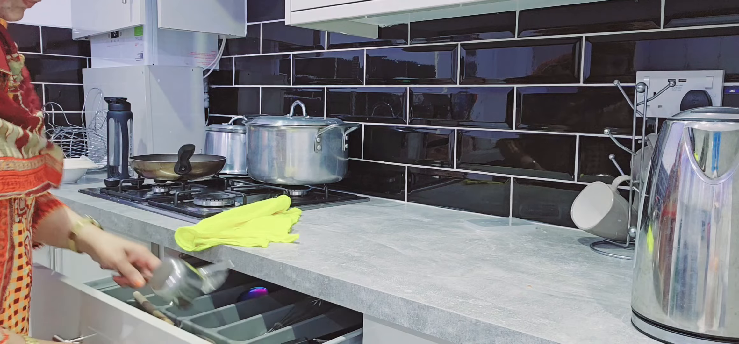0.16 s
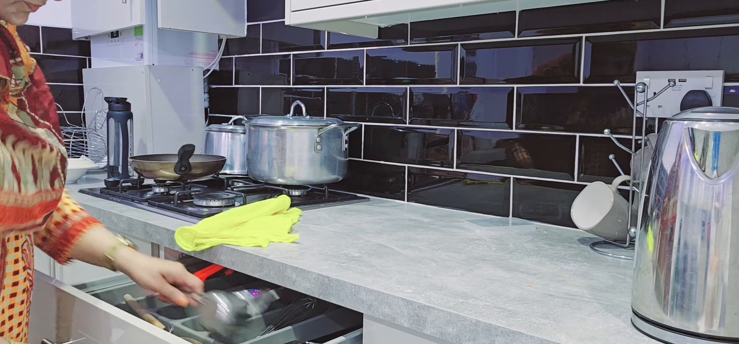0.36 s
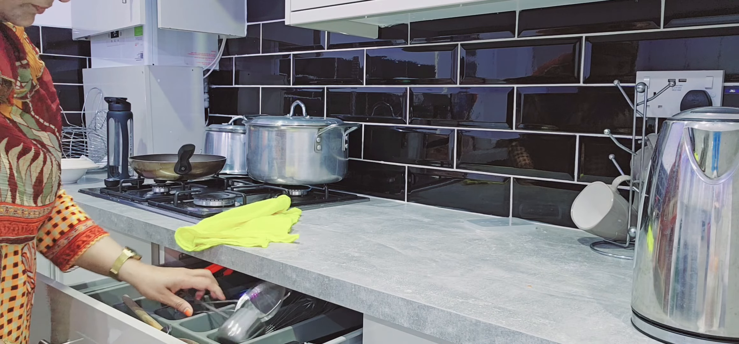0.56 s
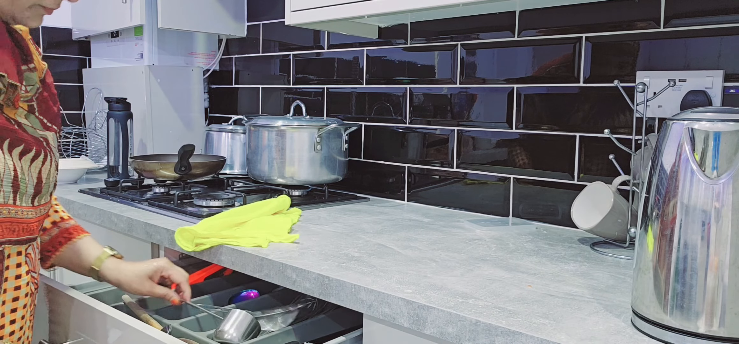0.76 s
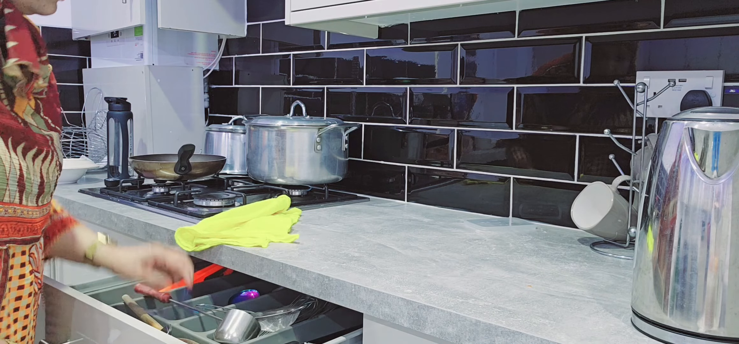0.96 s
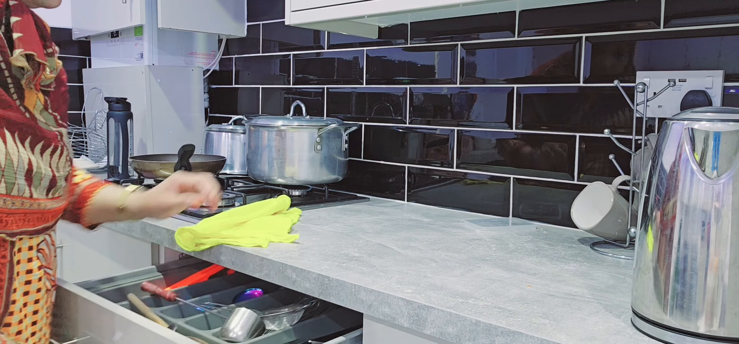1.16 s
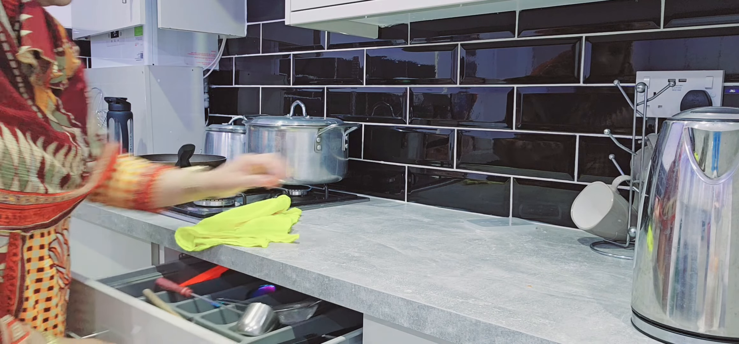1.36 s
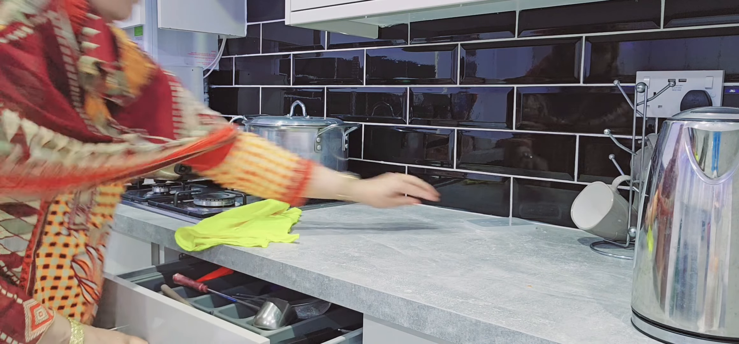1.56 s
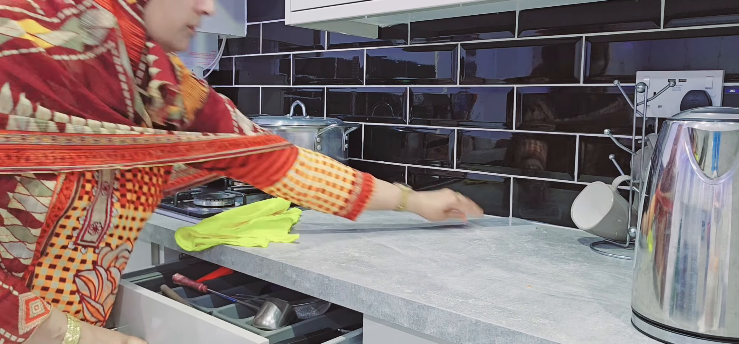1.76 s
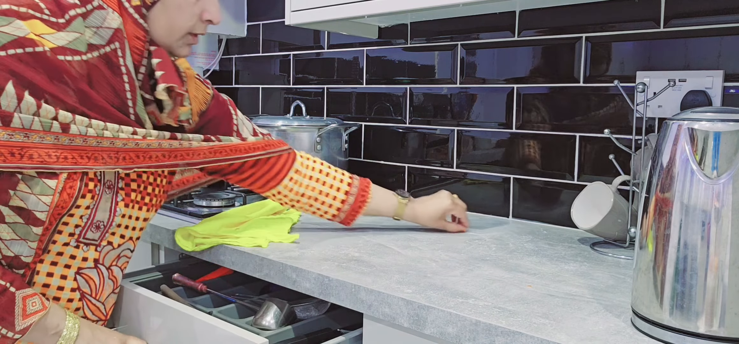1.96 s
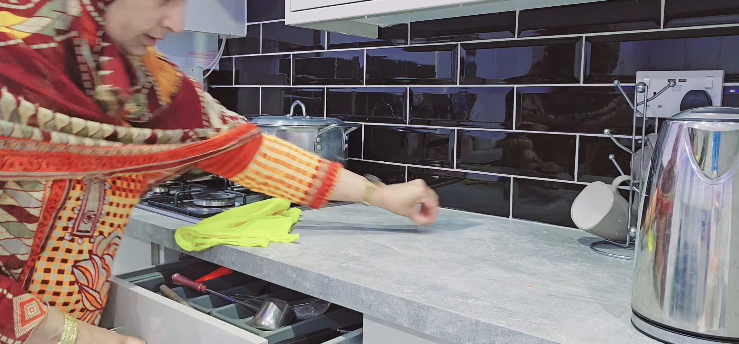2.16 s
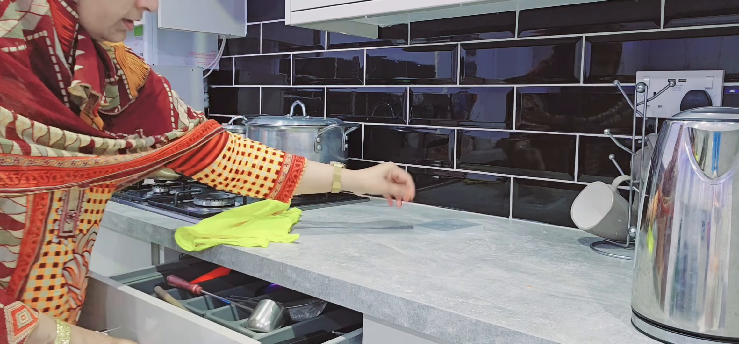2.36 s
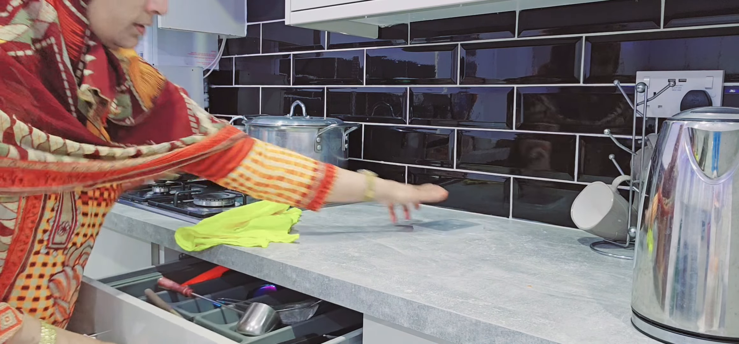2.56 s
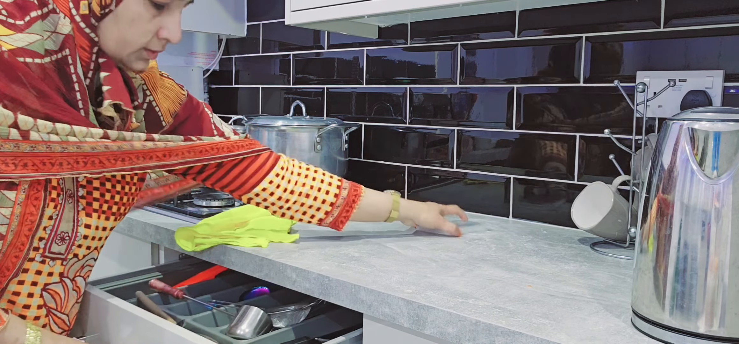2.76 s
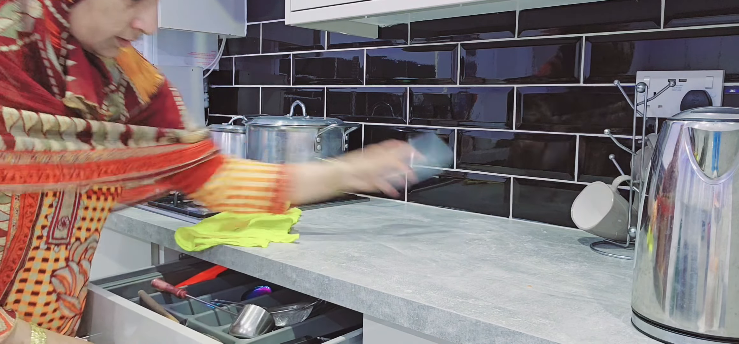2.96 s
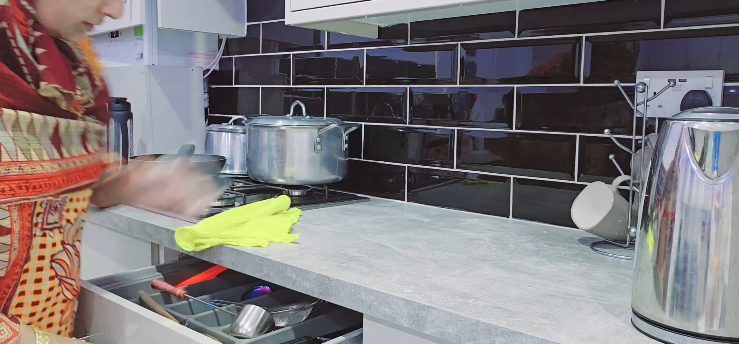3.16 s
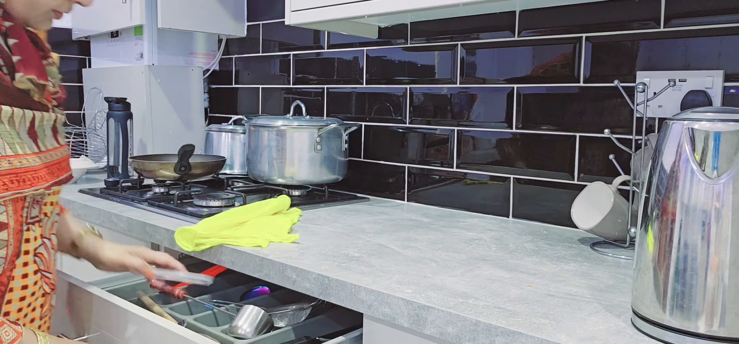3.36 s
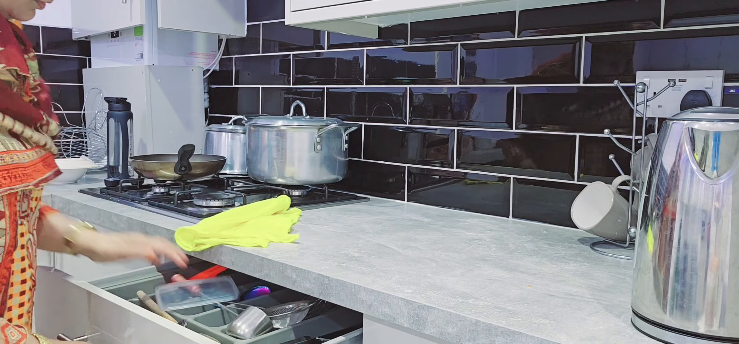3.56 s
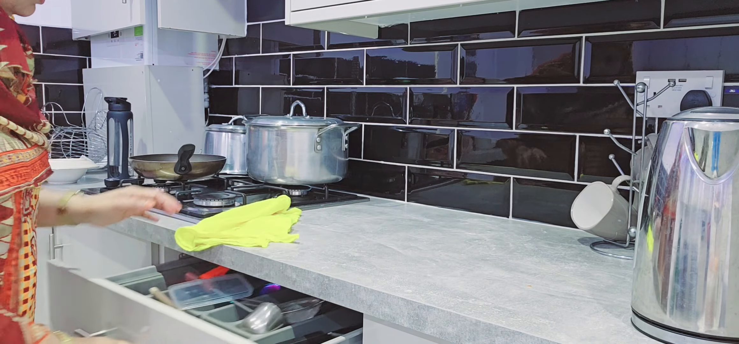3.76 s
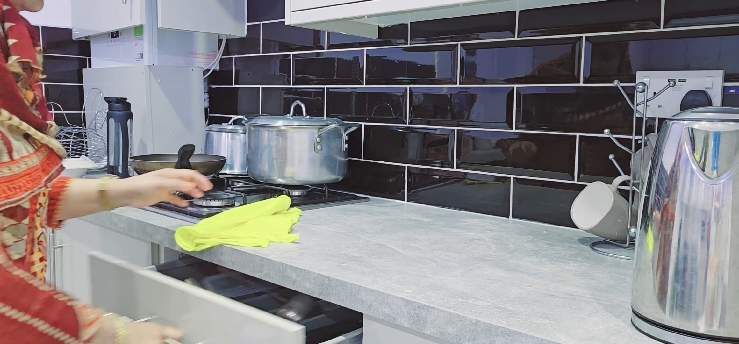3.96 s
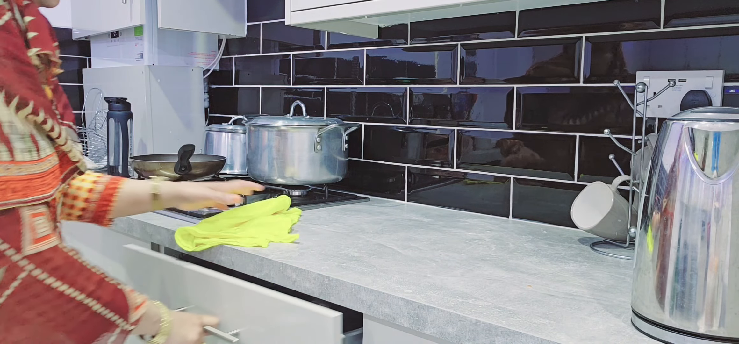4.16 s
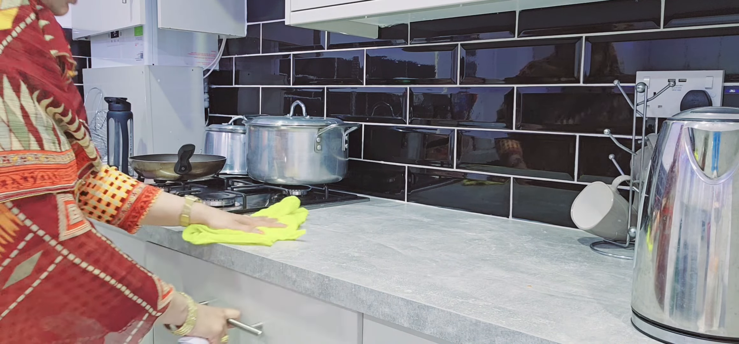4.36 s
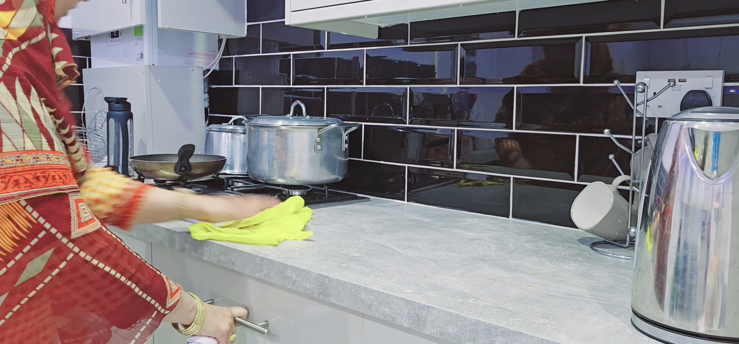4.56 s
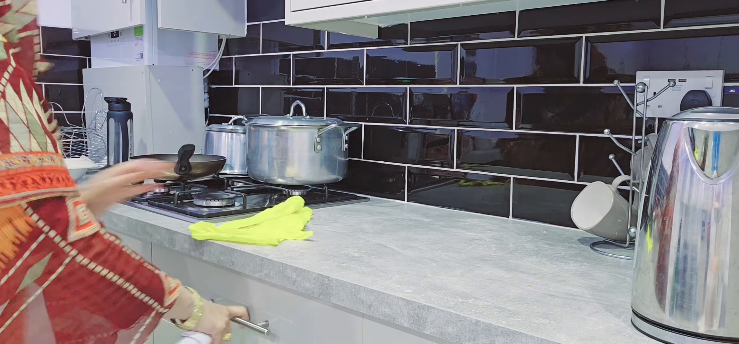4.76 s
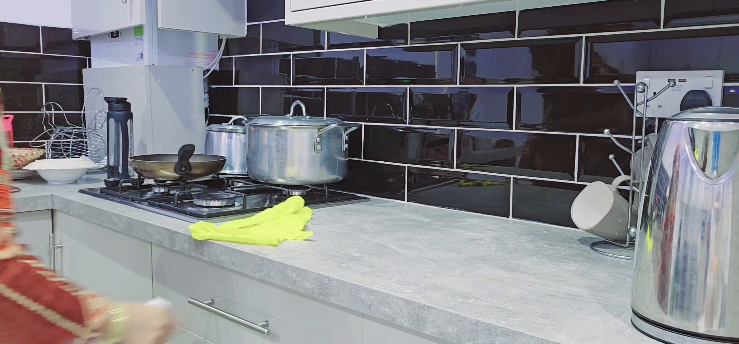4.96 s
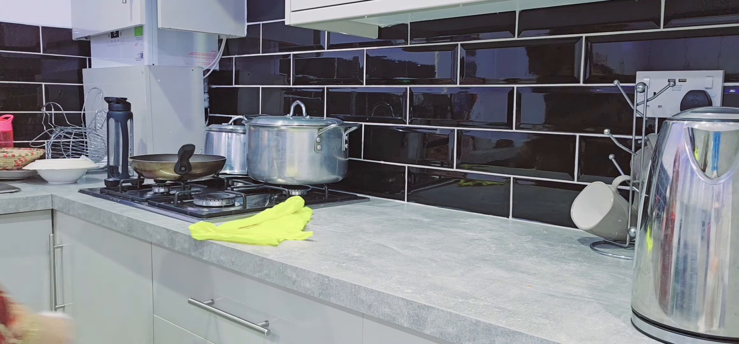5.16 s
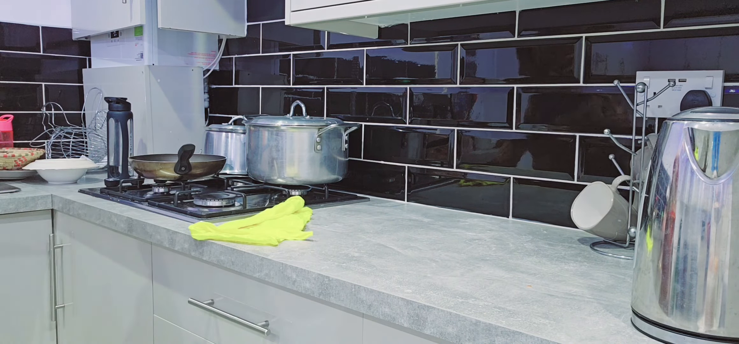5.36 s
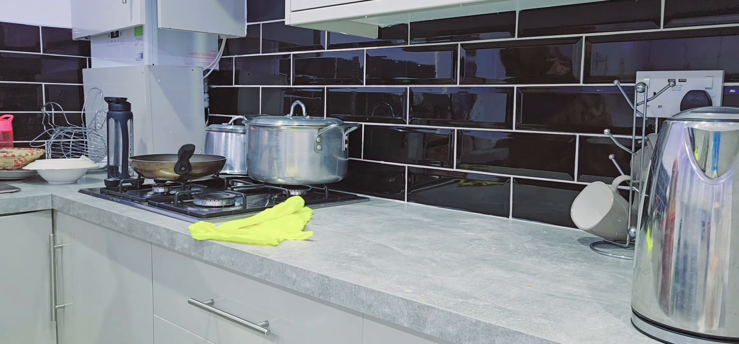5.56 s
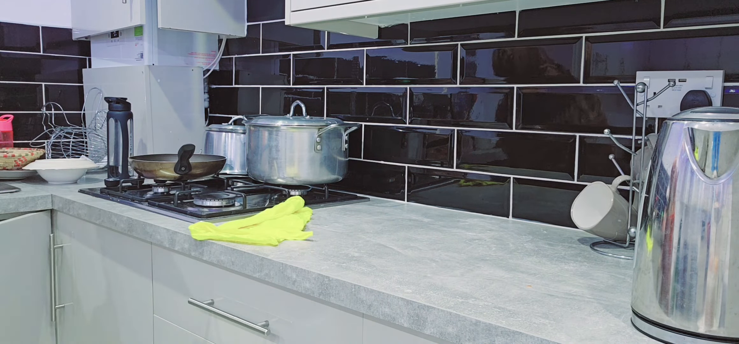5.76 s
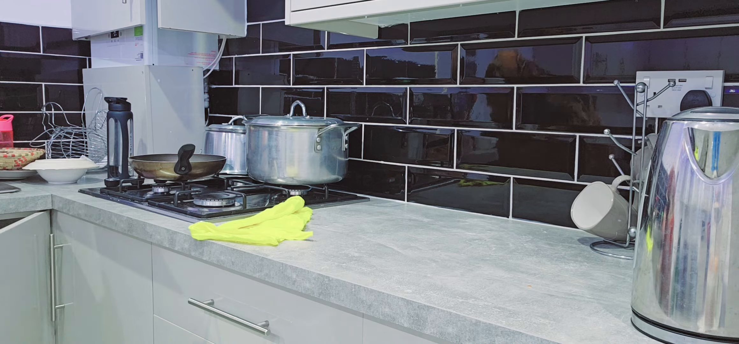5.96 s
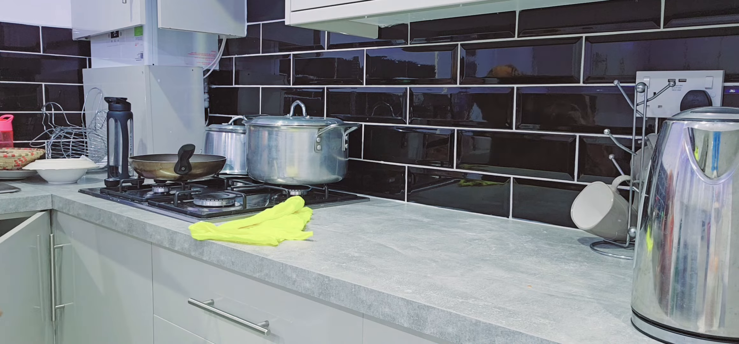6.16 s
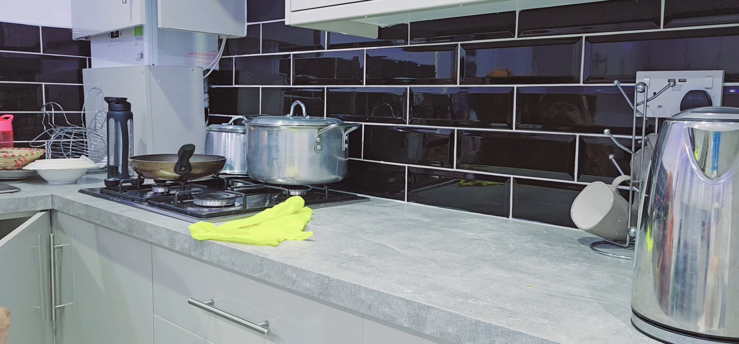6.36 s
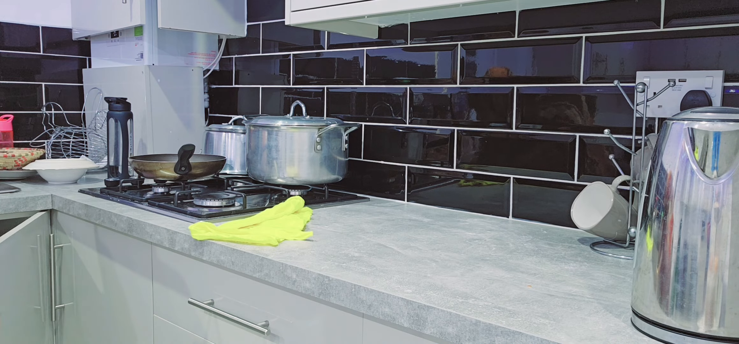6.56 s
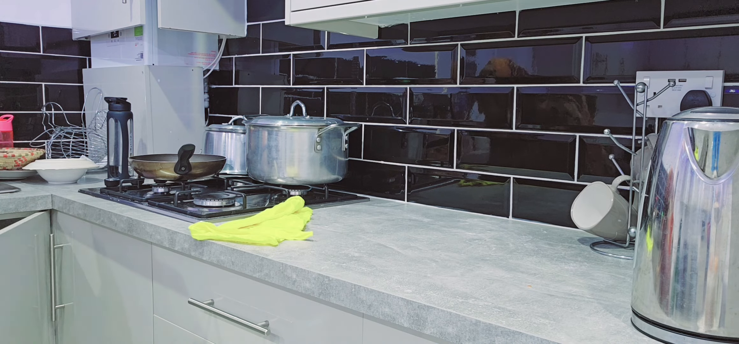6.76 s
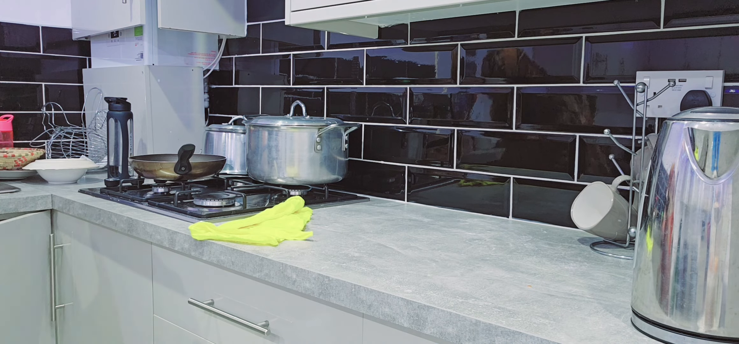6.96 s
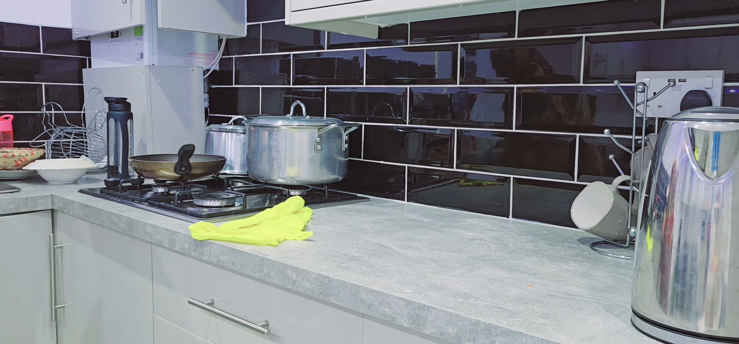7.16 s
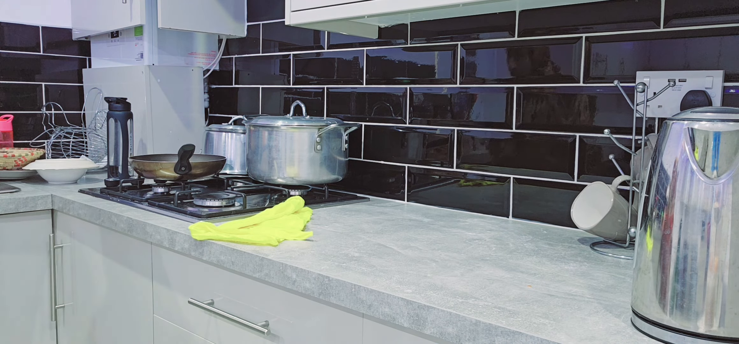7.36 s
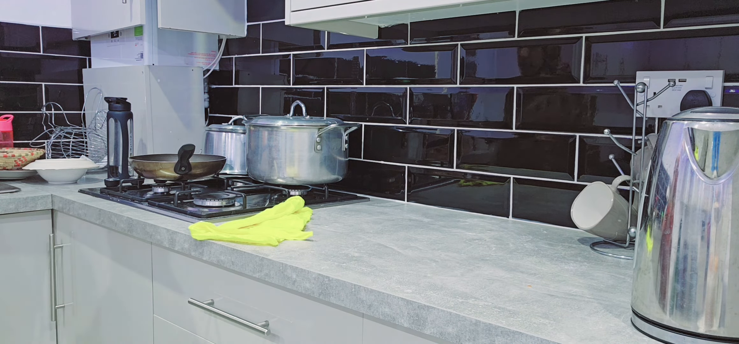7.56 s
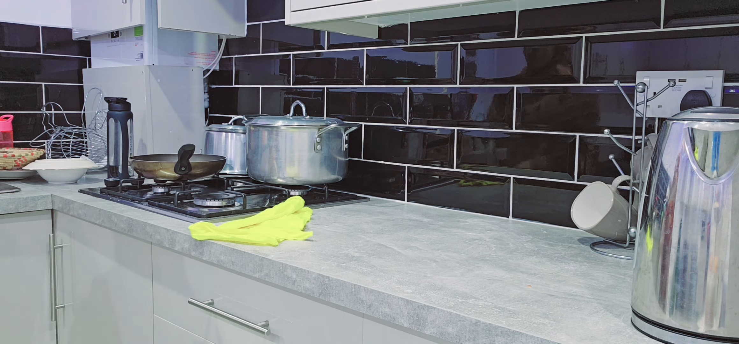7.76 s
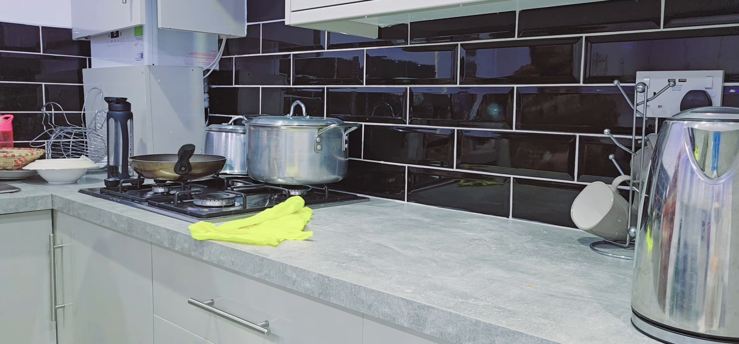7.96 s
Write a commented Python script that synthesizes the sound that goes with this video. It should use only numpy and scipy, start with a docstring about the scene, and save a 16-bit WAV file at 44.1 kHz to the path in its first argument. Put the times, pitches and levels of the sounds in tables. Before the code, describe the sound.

In a small tiled kitchen, a steel cup lands hard in a plastic cutlery tray and chatters, then a utensil handle knocks hollowly. A plastic lid scrapes faintly off the worktop and clacks into the tray. The drawer rumbles shut with a double thud. After quiet steps and cloth rustle, a cupboard door slaps shut and bounces twice. Close stereo microphones, drawer and cupboard to the left, faint fridge hum.

```python
"""A steel cup clatters into the plastic cutlery tray of an open drawer in a small tiled kitchen.
A utensil knocks beside it; a plastic lid is dragged off the worktop and dropped in too; the drawer rolls shut.
Someone steps aside and opens a cupboard, whose door falls shut and bounces twice. A fridge hums faintly.
Blows are noise bursts over decaying modes, friction is uneven shaped noise, the hum is a few sines;
two microphones a hand apart hear them directly and through the kitchen's reflections."""
import sys
import numpy as np
from scipy import signal
from scipy.fft import rfft, irfft, next_fast_len
from scipy.io import wavfile
from scipy.ndimage import map_coordinates

SR = 44100
rng = np.random.default_rng(int(sys.argv[2]) if len(sys.argv) > 2 else 0)


def to_wav(sig):
    """Store sig (one row per channel, or 1-D mono) as 16-bit WAV at the path in sys.argv[1].

    Samples outside -1..1 are clipped; the rate is SR.
    """
    pcm = np.clip(np.atleast_2d(sig), -1, 1) * 32767
    pcm = np.round(pcm).astype(np.int16)
    wavfile.write(sys.argv[1], SR, pcm.T)  # frames by channels


N = 353391
TIME = np.arange(N) / SR
AGE = TIME[:SR * 3 // 4]  # time since a blow, s


def amp(db):
    """Decibels to gain."""
    return 10 ** (np.asarray(db) / 20)


def unit(x):
    """x at rms 1."""
    return x / np.sqrt(np.mean(x ** 2) + 1e-20)


def along(points, hz):
    """(Hz, value) points read on a log frequency axis."""
    f, v = np.transpose(points)
    return np.interp(np.log(hz + 1), np.log(f + 1), v)


def fade(t, t60):
    """Free decay of 60 dB in t60 seconds."""
    return np.exp(-np.log(1000) * t / t60)


def filtered(x, response):
    """x times a response of frequency."""
    n = x.shape[-1]
    m = next_fast_len(n + 8192)
    return irfft(rfft(x, m) * response(np.fft.rfftfreq(m, 1 / SR)), m)[..., :n]


def split(x, colour, split_hz):
    """x in a colour, as its part below and its part above a frequency, each at rms 1."""
    low = filtered(x, lambda hz: amp(along(colour, hz)) / (1 + (hz / split_hz) ** 6))
    high = filtered(x, lambda hz: amp(along(colour, hz))) - low
    return unit(low), unit(high)


def wobble(rate):
    """A random curve of straight segments, rate knots a second."""
    return map_coordinates(rng.standard_normal(int(N * rate / SR) + 4), [TIME * rate], order=1)


def gains(rows, rise_share, release_t60):
    """Low and high gain of strokes: each swells over a share of its length, holds, then dies away."""
    total = np.zeros((2, N))
    for start, length, low_db, high_db in rows:
        age = np.maximum(TIME - start, 0)
        swell = np.sin(np.pi / 2 * np.minimum(age / (rise_share * length), 1)) ** 2
        release = fade(np.maximum(age - length, 0), release_t60)
        total += amp([[low_db], [high_db]]) * swell * release
    return total


def add(track, s, sound):
    """Mix a sound into a track at time s."""
    part = track[round(s * SR):][:len(sound)]
    part += sound[:len(part)]


def ring(modes, scatter_db, detune=.007, damping=1.215):
    """Modes swell and die; each blow loads them a little differently, in level and in pitch."""
    hz, db, t60, swell = np.transpose(modes)[:, :, None]
    size = amp(db + scatter_db * rng.standard_normal(hz.shape))
    pitch = hz * (1 + detune * rng.standard_normal(hz.shape))
    envelope = fade(AGE, t60 / damping) * (1 - np.exp(-(AGE / swell) ** 2))
    return np.sum(size * envelope * np.sin(2 * np.pi * pitch * AGE), axis=0)


def struck(hits, modes, colour, click_t60, rise, scatter_db):
    """Each blow: contact noise, a low clack and a high click (first row), and the ringing body (second)."""
    contact, ringing = np.zeros((2, N))
    for s, clack, click, body, t60, *_ in hits:
        low, high = split(rng.standard_normal(len(AGE)), colour, split_hz=3870)
        add(contact, s, amp(clack) * low * fade(AGE, t60) * (1 - np.exp(-AGE / rise)))
        add(contact, s, amp(click) * high * fade(AGE, click_t60) * (1 - np.exp(-2 * AGE / rise)))
        add(ringing, s, amp(body) * ring(modes, scatter_db))
    return contact, ringing


def rubbed(gain, colour, split_hz, grain_db, grain_rate):
    """Friction: tiny slips of uneven size, shaped by the body they shake; separate low and high gains."""
    slips = rng.standard_normal(N) * amp(grain_db * wobble(grain_rate))
    return np.sum(gain * split(slips, colour, split_hz), axis=0)


def rattle(gain, span, modes, count, level_db, spread_db, detune):
    """Loose things touch at random moments of a span, harder when the motion shaking them is stronger."""
    track = np.zeros(N)
    moments = rng.uniform(*span, size=count)
    for s, size in zip(moments, rng.standard_normal(size=count)):
        level = gain[round(s * SR)] * amp(level_db + spread_db * size)
        add(track, s, level * ring(modes, scatter_db=4, detune=detune, damping=1.8))
    return track


def diffuse(n):
    """Noise from all sides at two microphones a hand apart: alike in the bass, unrelated in the treble."""
    def mid_side(hz):
        turn = np.arccos(np.sinc(hz / 1150)) / 2
        return np.array([np.cos(turn), np.sin(turn)])

    mid, side = filtered(rng.standard_normal((2, n)), mid_side)
    return np.array([mid + side, mid - side])


def answer(near, far):
    """One pattern of reflections: a quick burst from drawer sides and tiles, then the room's tail."""
    # decay of the kitchen: f/Hz, t60/s
    room_decay = [(100, 0.39), (300, 0.42), (1000, 0.41), (5000, 0.34), (13000, 0.053)]
    # strength of the reverberation: f/Hz, level/dB
    wet_level = [(60, -7.5), (200, -2), (600, -4.5), (3000, -5.5), (12000, -0.5)]
    hz, t, z = signal.stft(diffuse(len(AGE)), SR, nperseg=256)
    t60 = along(room_decay, hz)[:, None]
    energy_scale = np.sqrt(2 * np.log(1000) / (t60 * SR))  # equal energy whatever the decay
    z = z * fade(t, t60) * amp(along(wet_level, hz))[:, None] * energy_scale
    tail = signal.istft(z, SR, nperseg=256)[1][:, :len(AGE)] * (1 - np.exp(-AGE / .004))
    walls = diffuse(len(AGE)) * fade(AGE, 0.054)
    early = signal.fftconvolve([near], amp(-2.5) * walls / np.linalg.norm(walls[0]), axes=1)
    return (early + signal.fftconvolve([far], tail, axes=1))[:, :N]


def in_kitchen(near, far, count=4):
    """Things and people move, so the reflections keep passing from one pattern to the next."""
    shift_s = 0.22  # from one pattern to the next
    echoes = np.zeros((2, N))
    for k in range(count):
        away = np.abs((TIME / shift_s - k) % count - count / 2)
        share = np.cos(np.pi / 2 * np.minimum(away, 1))
        echoes += answer(share * near, share * far)
    return echoes


def placed(contact, ringing, lead_ms, wet_db):
    """Direct sound at both microphones (left leads by lead_ms), feed to the near walls, feed to the room."""
    def lead(hz):
        return np.exp(1j * np.pi * hz * lead_ms / 1000 * np.array([[1], [-1]]))

    # the worktop shades the straight path of the contact noise
    direct = filtered(amp(-3.5) * contact + ringing, lead)
    return np.vstack([direct, contact, amp(wet_db) * (contact + amp(-5) * ringing)])


def fridge():
    """A slightly unsteady hum and whine over the still air of the room."""
    # fridge tones: f/Hz, mean rms level/dB
    hum_tones = [(49, -72.5), (150.5, -83), (2460, -87)]
    # colour of the room's air: f/Hz, relative level/dB per Hz
    air_colour = [(12, -47.5), (20, -13), (55, -17), (98, -24), (154, -18.5), (172, -21.5), (527, -25.5),
                  (660, -34), (718, -24), (1710, -32), (2460, -28.5), (2750, -32), (4670, -34.5),
                  (9500, -49), (12000, -44.5), (16000, -48.5)]
    hum = 0
    for hz, db in hum_tones:
        level = amp(db + 1.1 * wobble(1.4)) * np.sqrt(2)
        hum = hum + level * np.sin(2 * np.pi * hz * TIME + .5 * wobble(3.3))
    air = unit(filtered(diffuse(N), lambda hz: amp(along(air_colour, hz))))
    return hum + amp(-70) * air


def steps():
    """Soft steps and turns: friction noise, low for the floor thump and high for the rustling clothes."""
    # steps: start t/s, length/s, floor thump level/dB, rustle level/dB
    step_rows = [(1.2, 0.16, -73, -57.5), (4.63, 0.037, -51, -63), (4.76, 0.1, -65, -69.5),
                 (4.95, 0.056, -75.5, -73.5), (5.3, 0.088, -66.5, -67), (5.43, 0.076, -59, -76.5),
                 (5.79, 0.069, -55.5, -63), (6.02, 0.035, -69, -82), (6.33, 0.046, -61, -56),
                 (6.44, 0.034, -74, -72), (6.57, 0.11, -70, -58.5), (6.92, 0.019, -72.5, -61.5),
                 (7.08, 0.057, -71, -62.5), (7.35, 0.081, -58, -62)]
    # colour of steps and clothes: f/Hz, relative level/dB per Hz
    step_colour = [(15, -33), (25, 1), (53, 1.5), (212, -10.5), (384, -16), (476, -28), (516, -15.5),
                   (734, -19.5), (988, -19), (2110, -23), (5430, -25.5), (10000, -39), (16000, -39)]
    motion = gains(step_rows, rise_share=0.65, release_t60=0.44)
    return rubbed(motion, step_colour, split_hz=235, grain_db=3.5, grain_rate=70)


def cupboard():
    """The door is pulled open, a dish is nudged; the door slaps its frame and the air inside booms after."""
    # the door is pulled open: t/s, clack level/dB, click level/dB, body level/dB, clack t60/s
    pull_rows = [(5.795, -47, -48, -48.5, 0.17), (6.282, -69.5, -87, -50.5, 0.12),
                 (6.35, -52, -50.5, -46.5, 0.11)]
    # the door shuts and bounces: t/s, clack level/dB, click level/dB, body level/dB, clack t60/s
    slap_rows = [(7.477, -21.5, -21, -10.5, 0.09), (7.723, -23.5, -20.5, -13, 0.079),
                 (7.889, -31.5, -24.5, -19, 0.11)]
    # modes of the open door: f/Hz, level/dB, t60/s before damping, swell/s
    panel_modes = [(49.7, -12, 0.27, 0.06), (152, -2.5, 0.39, 0.028), (183.5, 5.5, 0.17, 0.0082),
                   (237, -1.5, 0.26, 0.0034)]
    # modes of the door leaf as it shuts: f/Hz, level/dB, t60/s before damping, swell/s
    leaf_modes = [(48.7, -7.5, 0.49, 0.026), (87, -10, 0.26, 0.045), (157.6, -24, 0.32, 0.0016),
                  (179.5, -16, 0.28, 0.0075), (258, -33, 0.81, 0.035), (306, -22, 0.29, 0.023),
                  (414, -31, 0.32, 0.001), (453, -31, 0.46, 0.00083), (568, -40.5, 0.57, 0.001),
                  (614, -41, 0.28, 0.032), (905, -26.5, 0.074, 0.0012)]
    # the air inside the cupboard: f/Hz, level/dB, t60/s before damping, swell/s
    air_modes = [(168.5, -0.5, 0.12, 0.02), (199.5, -9.5, 0.13, 0.014)]
    # a dish on a shelf: f/Hz, level/dB, t60/s before damping, swell/s
    dish_modes = [(1950, -5, 0.097, 0.0074), (2180, 3, 0.082, .008), (2500, 0, 0.088, 0.0055),
                  (2850, 1, .09, 0.006)]
    # the door's wooden slap: f/Hz, relative level/dB per Hz
    slap_colour = [(120, -14), (200, -9), (450, -15), (900, -13), (1500, -13), (2400, -10), (3300, -16),
                   (4500, -23), (6500, -36), (9000, -48), (16000, -59)]
    pulls = struck(pull_rows, panel_modes, slap_colour, click_t60=0.054, rise=0.0029, scatter_db=2.5)
    slams = struck(slap_rows, leaf_modes, slap_colour, click_t60=0.015, rise=0.0066, scatter_db=3.1)
    contact, ringing = np.add(pulls, slams)
    for s, _, _, body, _ in slap_rows:
        add(ringing, s + 0.04, amp(body) * ring(air_modes, scatter_db=4.8))  # 0.04 s after each slap
    add(ringing, 7.114, amp(-45) * ring(dish_modes, scatter_db=2.0))
    return contact, ringing


def metal_glides():
    """Smooth metal glides with a thin hiss, at the runners' end and in a hinge."""
    # glides: start t/s, length/s, hiss level/dB, top fizz level/dB
    glide_rows = [(4.55, 0.021, -60, -46), (6.01, 0.06, -71, -66.5)]
    # colour of gliding metal: f/Hz, relative level/dB per Hz
    glide_colour = [(2000, -37), (5000, 9), (8500, -2), (11000, 2.5), (16000, -2.5)]
    motion = gains(glide_rows, rise_share=0.22, release_t60=0.15)
    return rubbed(motion, glide_colour, split_hz=15000, grain_db=2.5, grain_rate=290)


def worktop():
    """Light things scrape along, on the worktop or in the jolted drawer, and tap on worktop and shelves."""
    # slides: start t/s, length/s, scrape level/dB, fizz level/dB
    slide_rows = [(1.865, 0.2, -46, -50.5), (2.745, 0.086, -51, -58.5), (4.425, 0.057, -63, -61),
                  (4.545, 0.013, -67, -49.5)]
    # the lid scraping on the worktop: f/Hz, relative level/dB per Hz
    scrape_colour = [(180, -45), (300, -15), (656, -26), (814, -9), (1100, -12), (1530, -3), (2440, -11),
                     (2880, -5), (3460, -12), (5080, -11), (11900, -24), (16000, -36)]
    # light taps: t/s, clack level/dB, click level/dB, body level/dB, clack t60/s
    tap_rows = [(1.884, -41.5, -51.5, -49, 0.15), (1.933, -54, -32.5, -36, 0.07),
                (2.065, -46.5, -67, -34.5, 0.036), (2.223, -36, -41.5, -47, 0.068),
                (2.772, -40, -62, -37.5, 0.089), (2.908, -55, -46, -46.5, 0.069),
                (4.802, -75, -61, -80, 0.02), (4.878, -60.5, -61, -61, 0.071),
                (5.311, -52.5, -76, -69, 0.03), (5.687, -72, -57.5, -78, 0.062),
                (6.934, -55, -55.5, -76.5, 0.065), (7.117, -62, -63.5, -81, 0.086)]
    # modes of the lid, rung by the taps: f/Hz, level/dB, t60/s before damping, swell/s
    lid_modes = [(1507, -2.5, 0.13, 0.00077), (1925, 9, 0.035, 0.0049), (2846, -16, 0.079, .001)]
    # contact noise of the taps: f/Hz, relative level/dB per Hz
    tap_colour = [(71, -58), (120, -15.5), (231, 2), (643, -17.5), (874, -3.5), (1940, -2), (2200, -9.5),
                  (2990, -12.5), (3590, -23), (11300, -41.5), (16000, -44)]
    motion = gains(slide_rows, rise_share=0.25, release_t60=0.27)
    scrape = rubbed(motion, scrape_colour, split_hz=3700, grain_db=3.5, grain_rate=250)
    contact, ringing = struck(tap_rows, lid_modes, tap_colour, click_t60=0.033, rise=0.0012, scatter_db=1.5)
    return scrape + contact, ringing


def push():
    """Gain of the rumble and of the bearing hiss while the drawer is pushed home on its runners."""
    # the push: t/s, rumble level/dB, bearing hiss level/dB, both before the surges
    push_curve = [(3.76, -61, -77), (3.87, -47.5, -68.5), (3.94, -41.5, -57.5), (4.02, -40, -51.5),
                  (4.09, -40, -50), (4.15, -45, -60.5), (4.24, -41.5, -51), (4.32, -52.5, -84),
                  (4.41, -51, -62.5), (4.45, -32.5, -72), (4.53, -46, -64)]
    s, *levels = np.transpose(push_curve)
    return amp([np.interp(TIME, s, db, left=-140, right=-140) for db in levels])


def damper(jitter, rough_db):
    """The damper sticks and slips as it brakes the drawer: a short, rough groan."""
    # the groan: t/s, mean pitch f/Hz, mean level/dB
    groan_curve = [(4.43, 392, -58), (4.455, 388, -39), (4.485, 382, -33), (4.508, 376, -41),
                   (4.525, 372, -58)]
    s, pitch, db = np.transpose(groan_curve)
    rough_pitch = np.interp(TIME, s, pitch) * (1 + jitter * wobble(300))
    phase = 2 * np.pi * np.cumsum(rough_pitch) / SR
    level = np.interp(TIME, s, db, left=-140, right=-140)
    return amp(level + rough_db * wobble(250)) * (np.sin(phase) + amp(-12.0) * np.sin(2 * phase))


def drawer():
    """The drawer rumbles on its bearings in surges, jiggles the utensils, meets its catch and the cabinet."""
    # the open drawer creeps as it is touched or leant on; the last row is a brief low thump: # start t/s,
    # length/s, rumble level/dB, bearing hiss level/dB, both before the surges
    nudge_rows = [(0.0, 0.0036, -44.5, -67), (1.22, 0.26, -49.5, -68.5), (2.35, 0.46, -63.5, -97),
                  (2.755, 0.019, -59.5, -69)]
    # colour of the rolling: f/Hz, relative level/dB per Hz
    roll_colour = [(21, -37.5), (35, -10), (159, -0.5), (210, -6.5), (245, -2), (294, -4), (370, -21.5),
                   (490, -8.5), (667, -22), (1090, -20), (1330, -32), (1480, -21.5), (3350, -29.5),
                   (5450, -32), (16000, -53)]
    # the jiggled utensils: f/Hz, level/dB, t60/s before damping, swell/s
    utensil_modes = [(497, 1, 0.09, 0.0027), (1039, 8, 0.2, 0.0029), (1330, -8, 0.1, 0.0022),
                     (1546, -3, 0.2, .001)]
    # the catch, then the cabinet: t/s, clack level/dB, click level/dB, body level/dB, clack t60/s
    bump_rows = [(4.34, -57, -52, -29.5, 0.14), (4.422, -26.5, -31, -20, 0.18),
                 (4.533, -22.5, -22, -13, 0.095)]
    # modes of the drawer: f/Hz, level/dB, t60/s before damping, swell/s
    drawer_modes = [(38, -2.5, 0.21, 0.009), (62, -6.3, 0.38, 0.011), (87, 0.0, 0.12, 0.011),
                    (121, -8.6, 0.15, 0.015), (154, -2.5, 0.14, 0.007), (170, -18.6, 0.49, 0.004),
                    (185, -25.6, 0.52, 0.006), (211, -6.3, 0.13, 0.01), (254, -10.7, 0.12, 0.002)]
    # contact noise of the drawer: f/Hz, relative level/dB per Hz
    bump_colour = [(120, -11), (200, -9.5), (491, -16), (1060, -12), (1270, -21), (1400, -12),
                   (2170, -17.5), (2380, -14.5), (3250, -28), (4680, -35), (10100, -65.5), (16000, -76)]
    surges = amp(1.6 * wobble(28))
    motion = (push() + gains(nudge_rows, rise_share=0.41, release_t60=0.86)) * surges
    roll = rubbed(motion, roll_colour, split_hz=1500, grain_db=3.5, grain_rate=200)
    jiggle = rattle(motion[0], (3.9, 4.3), utensil_modes, count=22, level_db=-14, spread_db=0.5, detune=0.115)
    contact, ringing = struck(bump_rows, drawer_modes, bump_colour,
                              click_t60=0.02, rise=0.00096, scatter_db=1.06)
    return roll + contact, ringing + jiggle + damper(jitter=.08, rough_db=2.0)


def plastic():
    """A utensil handle, later the lid, knock hollowly on the tray's dividers."""
    # the handle knocks: t/s, clack level/dB, click level/dB, body level/dB, clack t60/s
    handle_rows = [(1.007, -19, -34.5, -22, 0.12)]
    # the lid drops in and settles: t/s, clack level/dB, click level/dB, body level/dB, clack t60/s
    lid_rows = [(3.5344, -23, -19, -52, 0.038), (3.5444, -24, -47, -51, 0.05),
                (3.5848, -39, -43, -31, 0.31), (3.6404, -36, -31, -50, 0.11),
                (3.7324, -41, -46, -58, 0.066), (3.7569, -43.5, -46.5, -54, 0.095)]
    # modes of the dividers: f/Hz, level/dB, t60/s before damping, swell/s
    divider_modes = [(434, -8.5, 0.24, 0.001), (476, -3.4, 0.25, 0.001), (591, -8.7, 0.28, 0.005),
                     (723, -8.2, 0.27, 0.004), (819, -4, 0.12, 0.002), (878, -12.6, 0.32, 0.002),
                     (1119, -13.5, 0.21, 0.001), (1239, -15.1, 0.26, 0.008), (1371, -16.5, 0.3, 0.001),
                     (1707, -17.2, 0.27, 0.001), (1926, -15.6, 0.16, 0.002), (2139, -25.5, 0.32, 0.002)]
    # contact noise of the handle: f/Hz, relative level/dB per Hz
    handle_colour = [(88, -64), (150, -20.5), (321, -19), (484, -5.5), (662, -15), (800, -3), (900, -9),
                     (1560, -13.5), (1690, -14), (2980, -26.5), (5150, -38.5), (16000, -50)]
    # the plastic lid's clack: f/Hz, relative level/dB per Hz
    lid_colour = [(150, -40), (300, -10), (500, -6), (850, -2), (1300, -13), (3000, -13), (5400, -11),
                  (9000, -19), (16000, -23)]
    handle = struck(handle_rows, divider_modes, handle_colour, click_t60=0.12, rise=0.0034, scatter_db=3.0)
    lid = struck(lid_rows, divider_modes, lid_colour, click_t60=0.029, rise=0.0019, scatter_db=3.5)
    return np.add(handle, lid)


def tray():
    """The cup lands and chatters in the plastic tray, its steel wall rings; cup and later lid skid there."""
    # the cup lands: t/s, clack level/dB, click level/dB, body level/dB, clack t60/s, steel ring level/dB
    landing_rows = [(0.477, -3.5, -20.5, -21, 0.038, -34.5), (0.485, -16, -27.5, -28, 0.017, -36.5),
                    (0.543, -24.5, -24, -42.5, 0.11, -27), (0.69, -8, -31, -42, 0.029, -38.5),
                    (0.814, -23, -40, -45, 0.07, -43), (0.842, -25.5, -34, -46, 0.06, -55.5)]
    # modes of the tray: f/Hz, level/dB, t60/s before damping, swell/s
    tray_modes = [(46, -22, 0.55, 0.02), (89, -30, 0.45, 0.02), (172, -12.2, 0.46, 0.001),
                  (205, -19.2, 0.54, 0.001), (236, -14.4, 0.55, 0.02), (292, -3.4, 0.25, 0.016),
                  (345, -7.5, 0.36, 0.003), (374, 0.0, 0.12, 0.002), (428, -11.4, 0.43, 0.004),
                  (475, -17.3, 0.55, 0.017), (545, -1.1, 0.27, 0.002), (606, -6.3, 0.31, 0.001),
                  (703, -3.6, 0.31, 0.003), (817, -18.4, 0.53, 0.009), (872, -9.6, 0.41, 0.001)]
    # modes of the steel cup: f/Hz, level/dB, t60/s before damping, swell/s
    cup_modes = [(1119, -10.0, 0.32, 0.001), (1520, -6.0, 0.32, 0.001), (1648, -11.2, 0.47, 0.001),
                 (2026, -8.3, 0.29, 0.001), (2350, 0.0, 0.17, 0.003), (3621, -9.1, 0.22, 0.001),
                 (4577, -4.9, 0.19, 0.001), (4752, -6.2, 0.24, 0.001), (5480, -5.9, 0.18, 0.001),
                 (6060, -1.7, 0.12, 0.001), (6513, -20.6, 0.47, 0.001), (7551, -20.6, 0.4, 0.001)]
    # cup and lid skid: start t/s, length/s, scrape level/dB, fizz level/dB
    skid_rows = [(0.464, 0.011, -41.5, -52), (0.55, 0.13, -46, -45), (0.84, 0.07, -47.5, -54.5),
                 (3.495, 0.031, -50.5, -61), (3.56, 0.082, -49, -54)]
    # contact noise of the tray: f/Hz, relative level/dB per Hz
    tray_colour = [(53, -48.5), (90, -17.5), (290, -7), (478, -9.5), (544, -6.5), (647, -21.5), (706, -7.5),
                   (1290, -11), (1510, -8.5), (1790, -14.5), (4170, -19.5), (5410, -23.5), (16000, -32.5)]
    contact, ringing = struck(landing_rows, tray_modes, tray_colour,
                              click_t60=0.05, rise=0.0077, scatter_db=0.5)
    for s, *_, steel in landing_rows:
        add(ringing, s, amp(steel) * ring(cup_modes, scatter_db=3, damping=3.8))
    motion = gains(skid_rows, rise_share=0.81, release_t60=0.39)
    skid = rubbed(motion, tray_colour, split_hz=3000, grain_db=1.5, grain_rate=300)
    chatter = rattle(motion[1], (0.57, 0.96), cup_modes, count=10, level_db=-14.5, spread_db=3, detune=.006)
    return contact + skid + chatter, ringing


def scene():
    """The drawer and cupboard are to the left of the microphones, the worktop is straight ahead."""
    sources = placed(steps(), 0, lead_ms=0.14, wet_db=1.0)
    sources += placed(*cupboard(), lead_ms=0.14, wet_db=1.0)
    sources += placed(metal_glides(), 0, lead_ms=-0.017, wet_db=5)
    sources += placed(*worktop(), lead_ms=-0.017, wet_db=5)
    sources += placed(*drawer(), lead_ms=.15, wet_db=-1)
    sources += placed(*plastic(), lead_ms=0.186, wet_db=-0.5)
    sources += placed(*tray(), lead_ms=0.15, wet_db=3.0)
    left, right, near, far = sources
    return np.array([left, right]) + in_kitchen(near, far) + fridge()


def record(dry):
    """Two capsules differ a little in level and bass phase; they lose the deepest bass and the top treble."""
    low_cut_hz, top_hz = 20, 15900

    def response(hz):
        mismatch = np.exp(np.array([[1], [-1]]) * (0.028 + .13j / (1 + hz / 140)))
        low_cut = signal.freqs(*signal.butter(3, low_cut_hz, 'high', analog=True), hz)[1]
        return mismatch * low_cut * np.clip((top_hz - hz) / 300 + .5, 0, 1)

    return filtered(dry, response)


dry = scene()
out = record(dry)
to_wav(out)
```